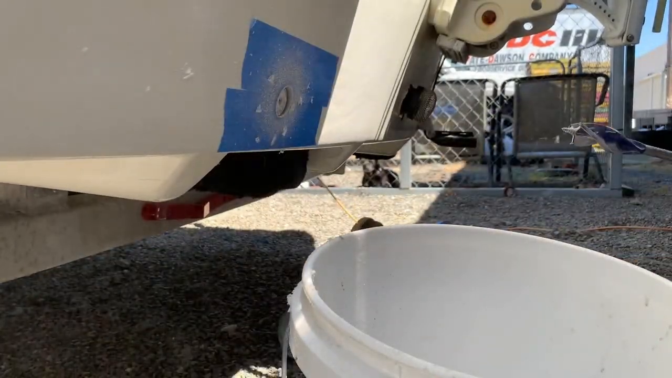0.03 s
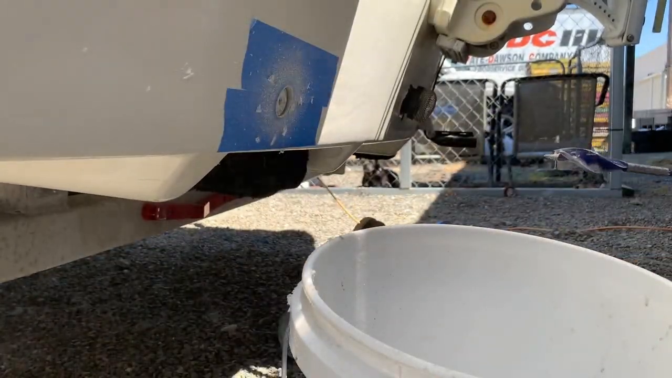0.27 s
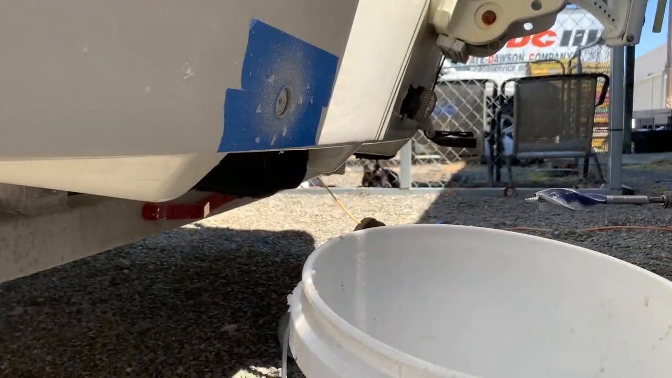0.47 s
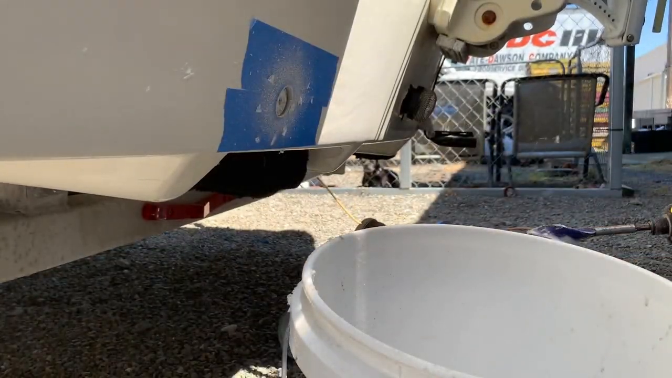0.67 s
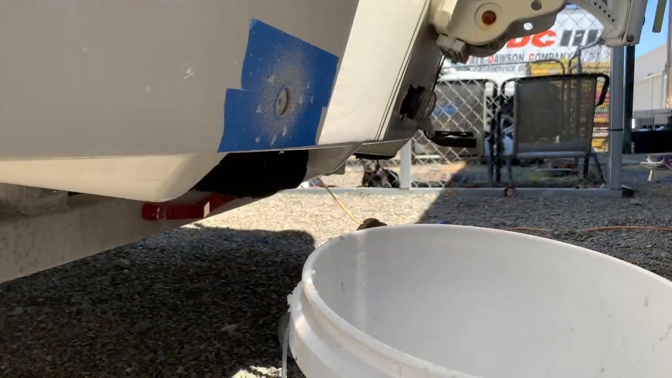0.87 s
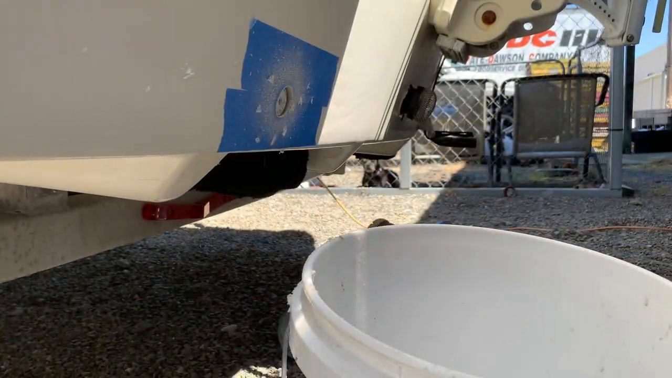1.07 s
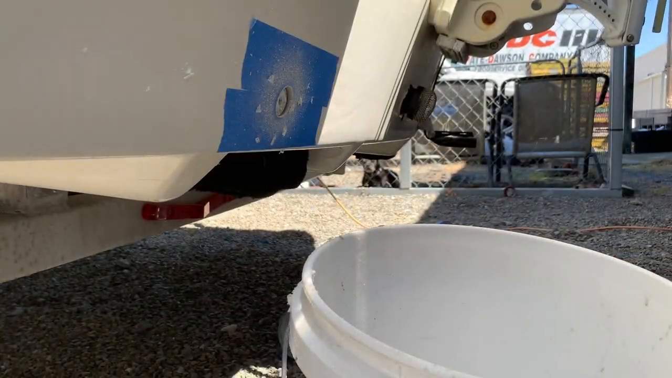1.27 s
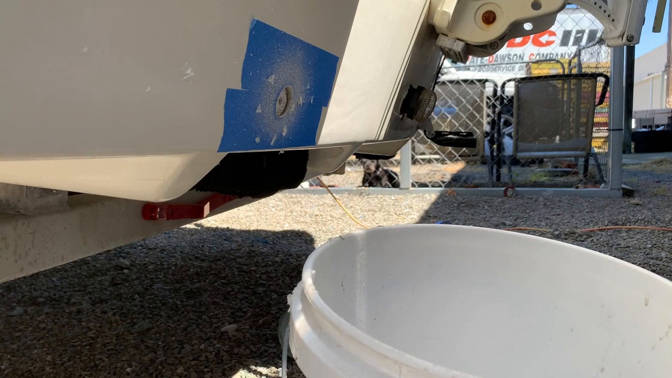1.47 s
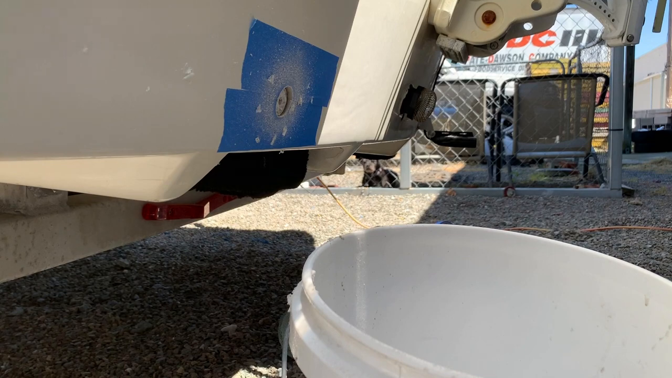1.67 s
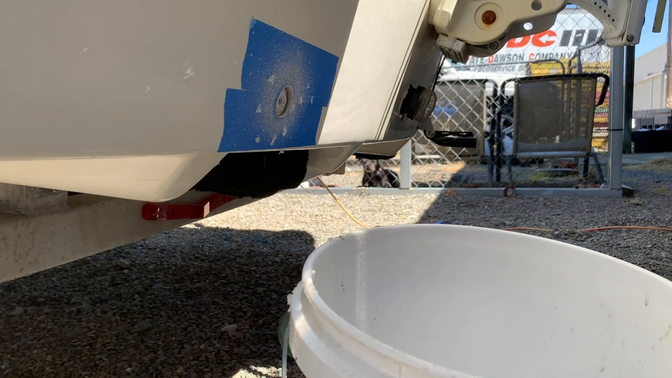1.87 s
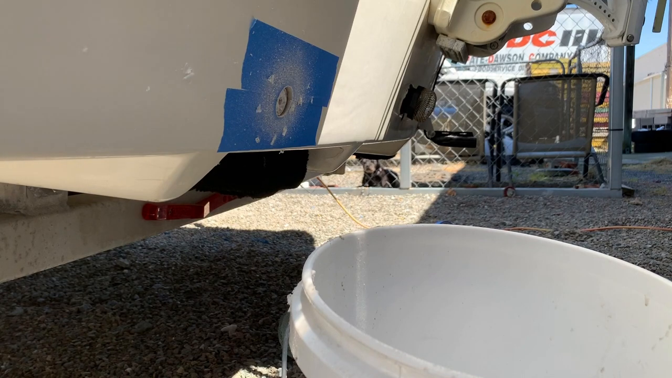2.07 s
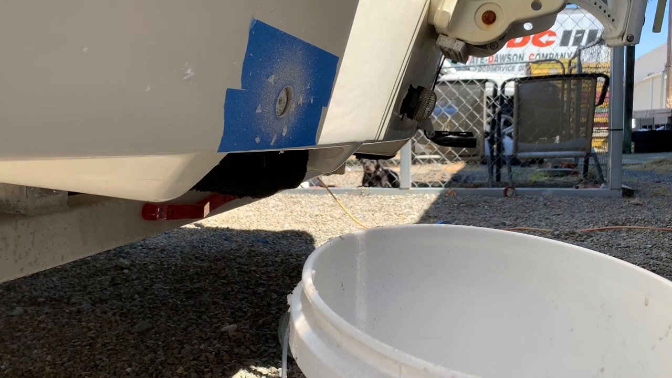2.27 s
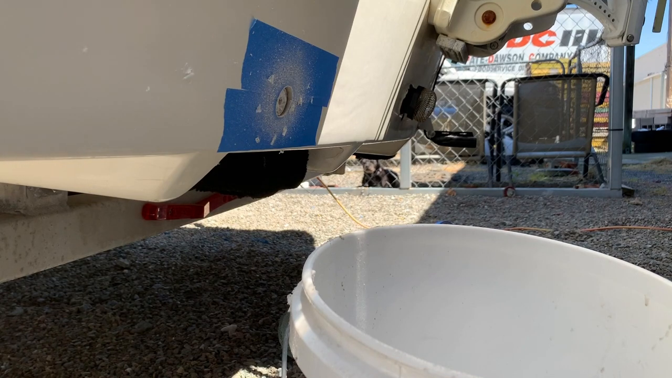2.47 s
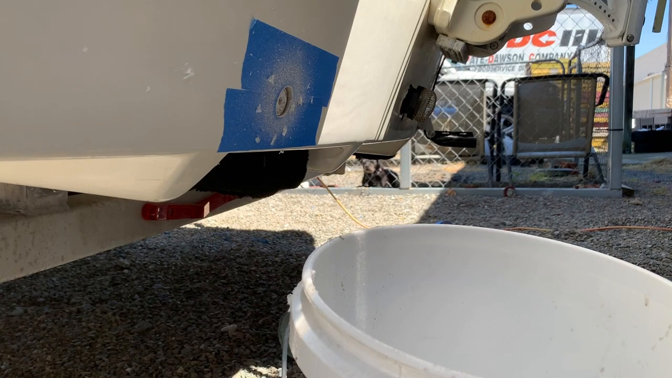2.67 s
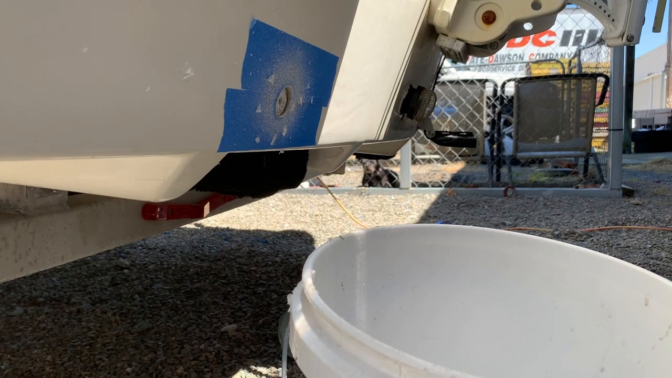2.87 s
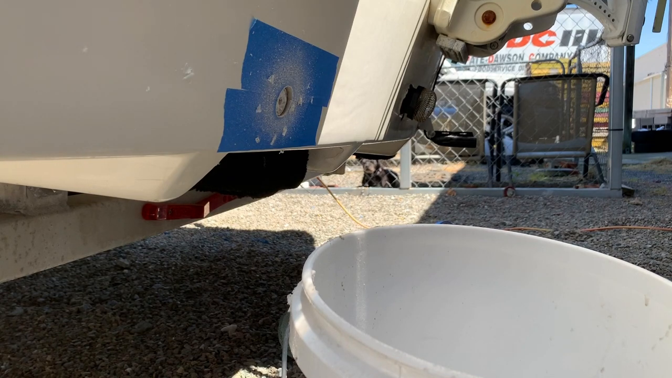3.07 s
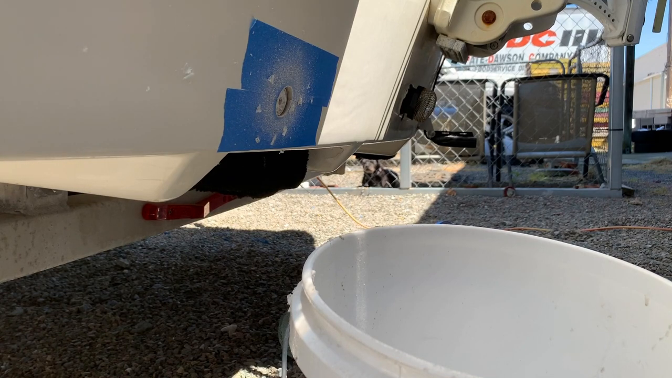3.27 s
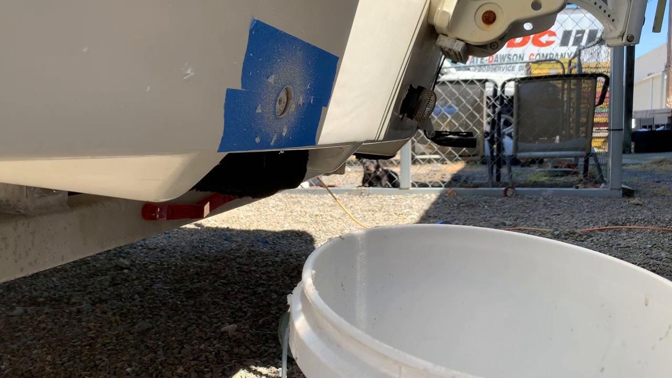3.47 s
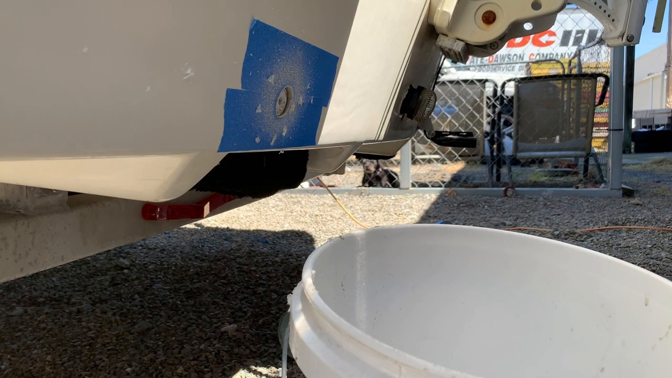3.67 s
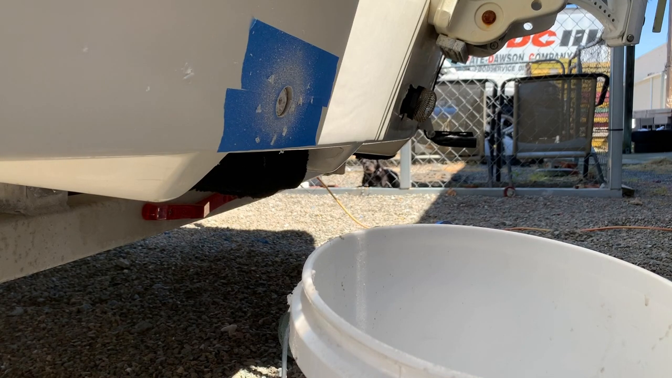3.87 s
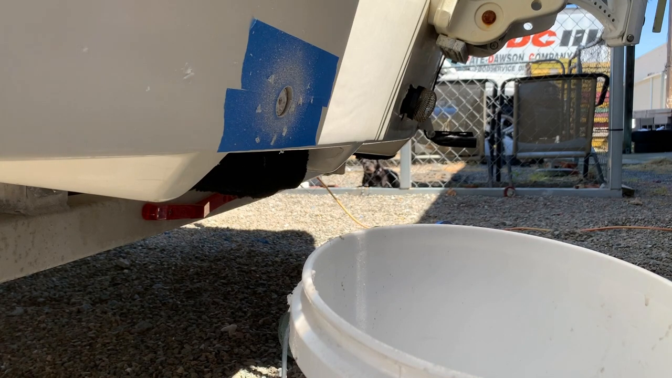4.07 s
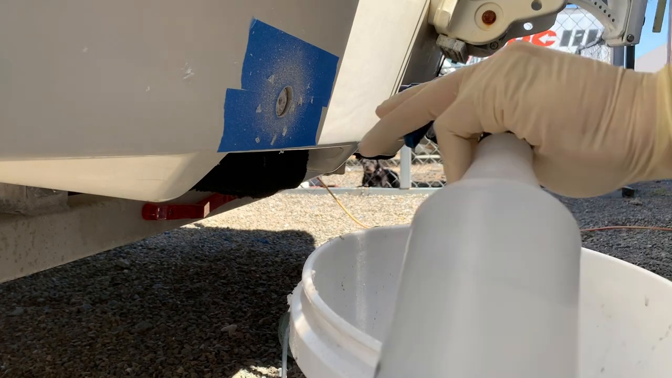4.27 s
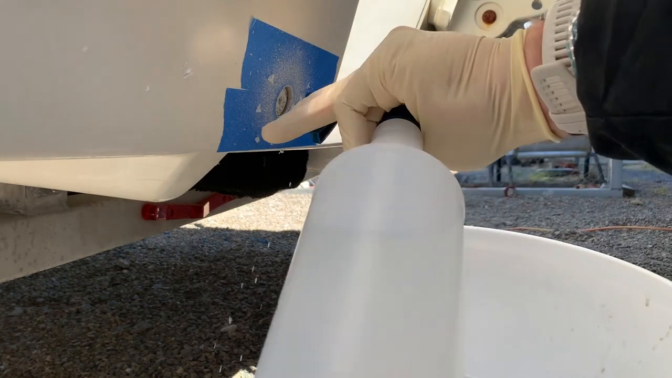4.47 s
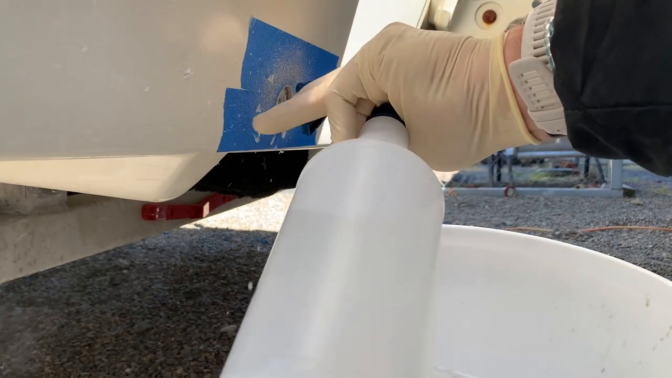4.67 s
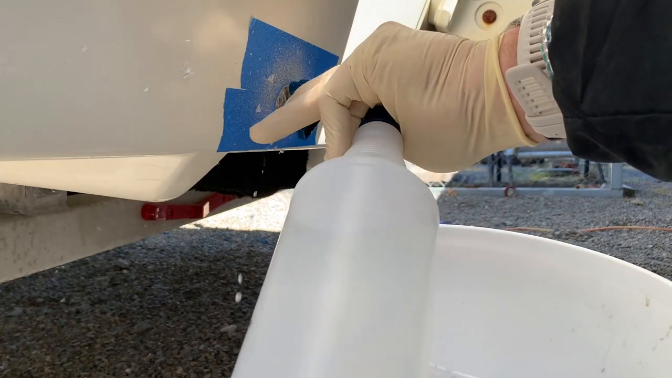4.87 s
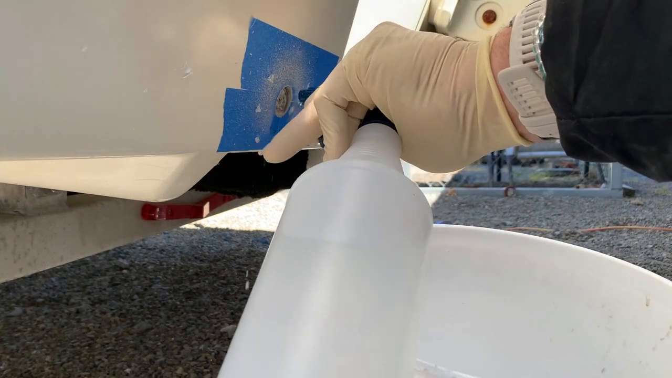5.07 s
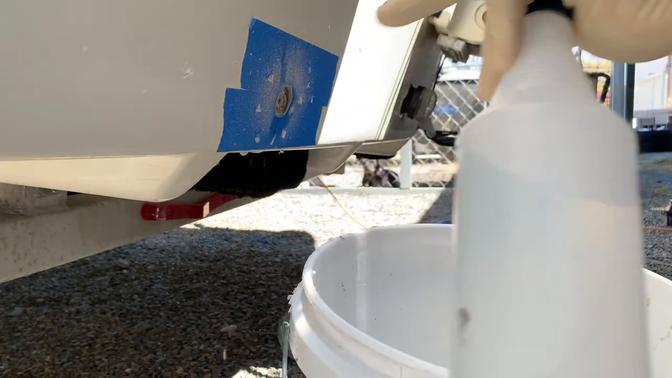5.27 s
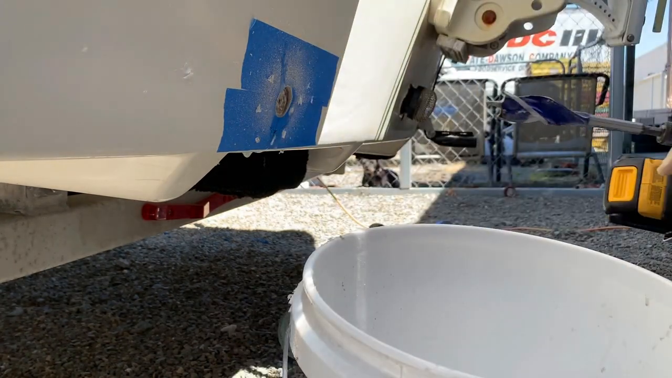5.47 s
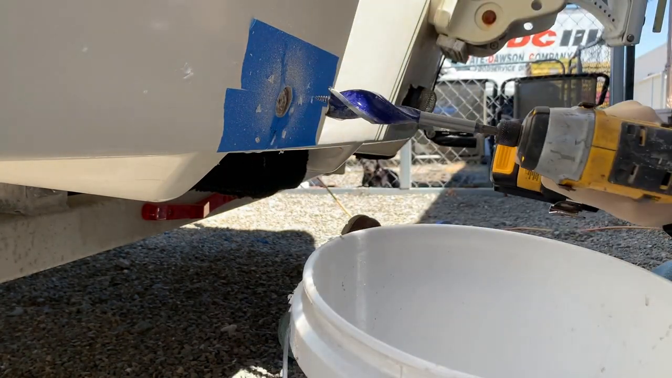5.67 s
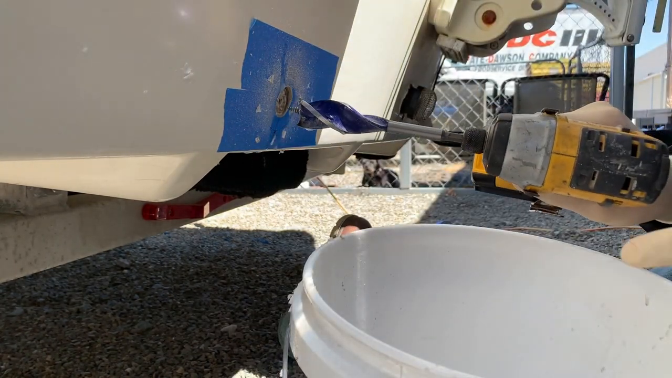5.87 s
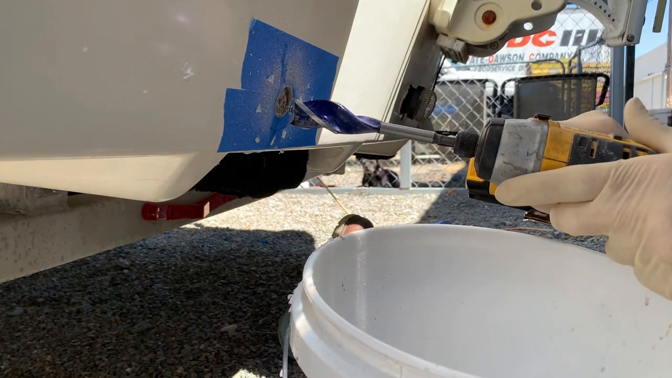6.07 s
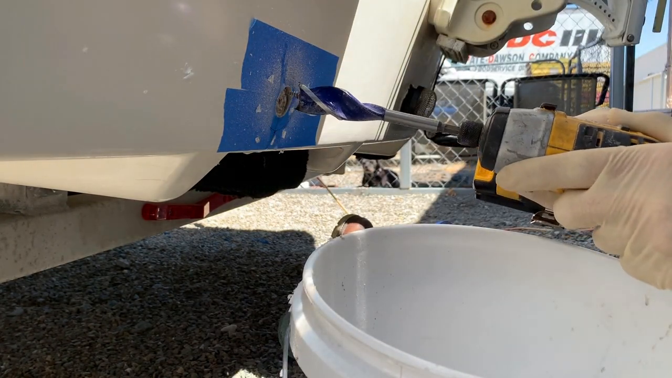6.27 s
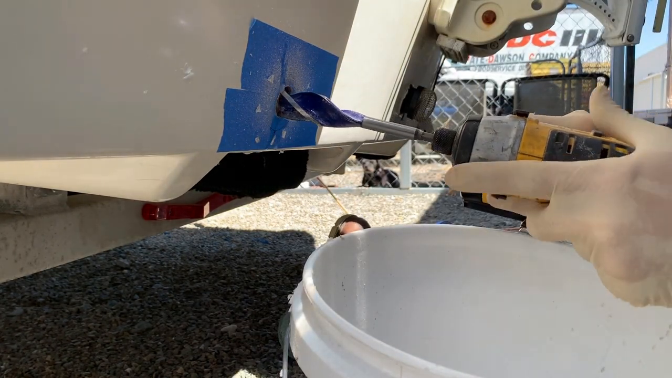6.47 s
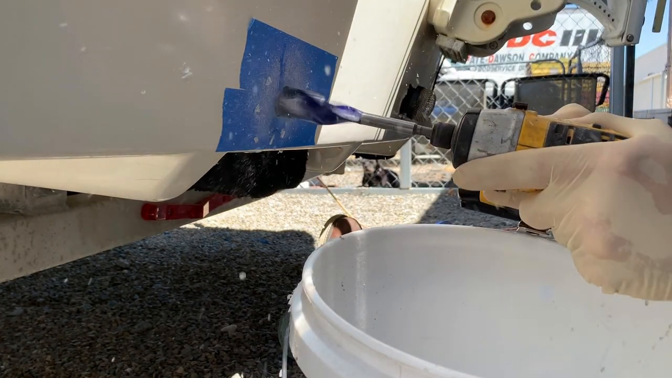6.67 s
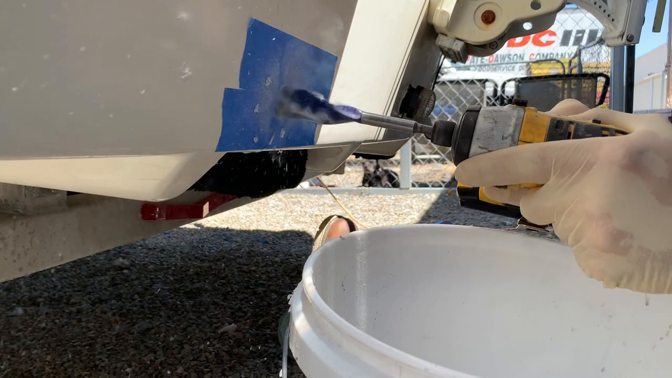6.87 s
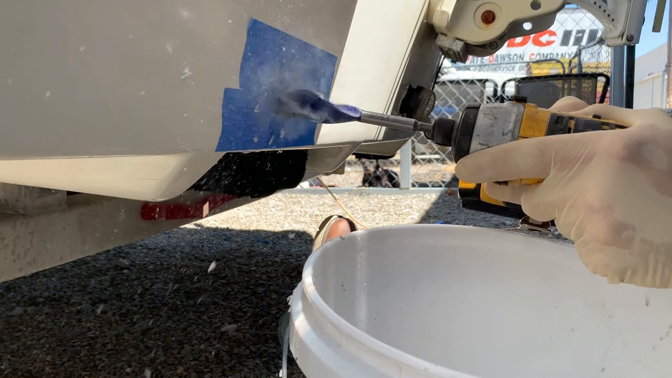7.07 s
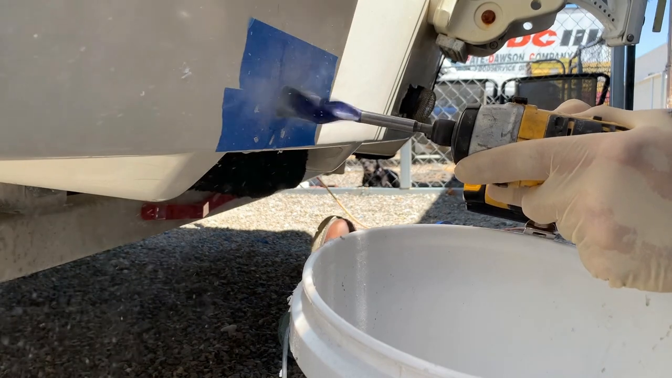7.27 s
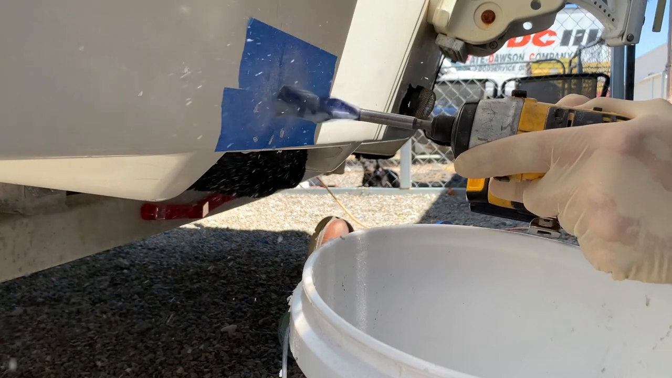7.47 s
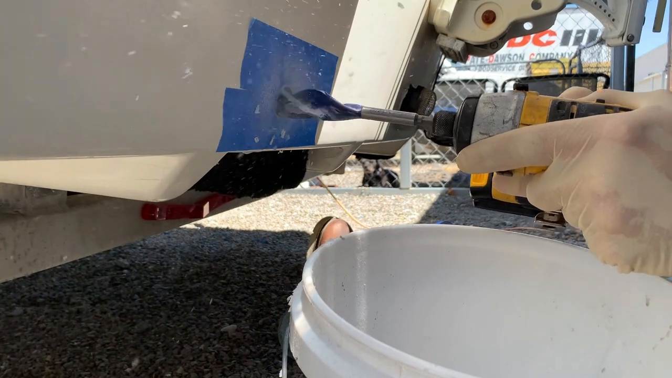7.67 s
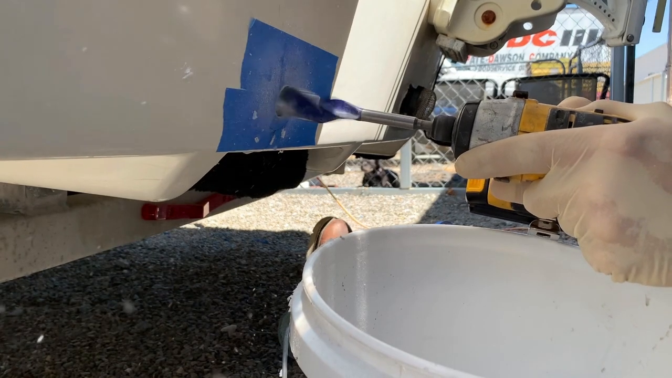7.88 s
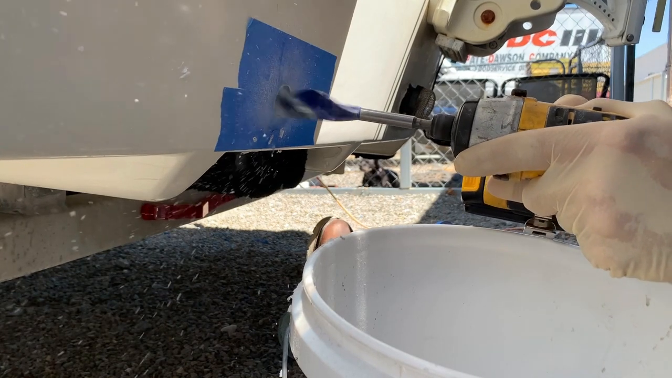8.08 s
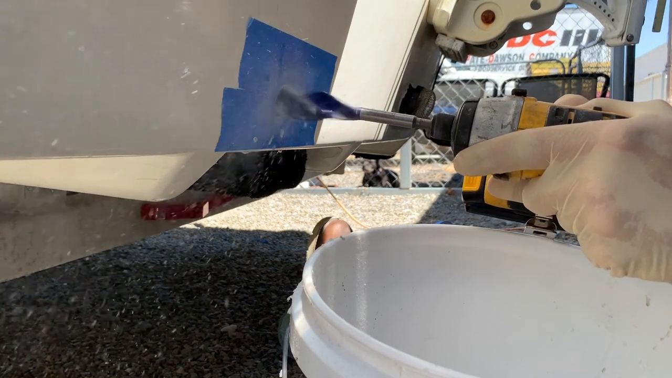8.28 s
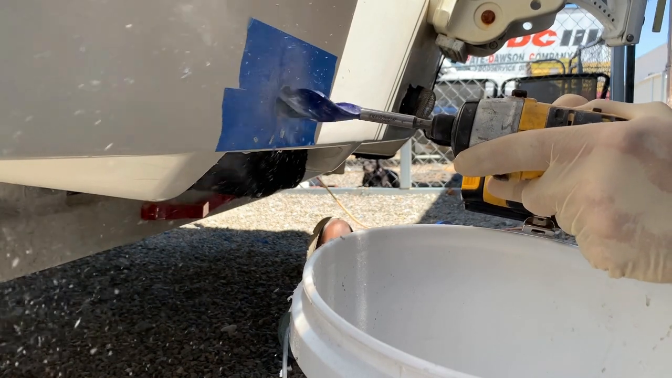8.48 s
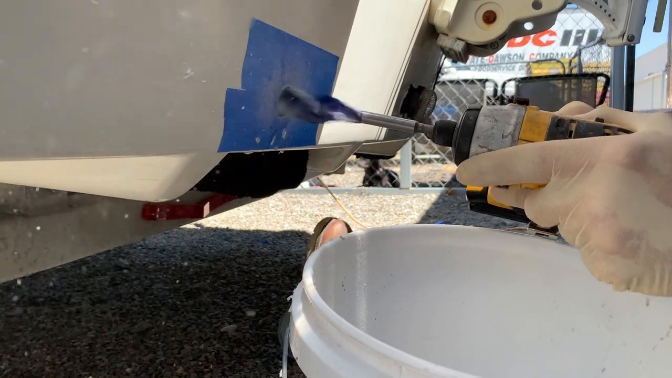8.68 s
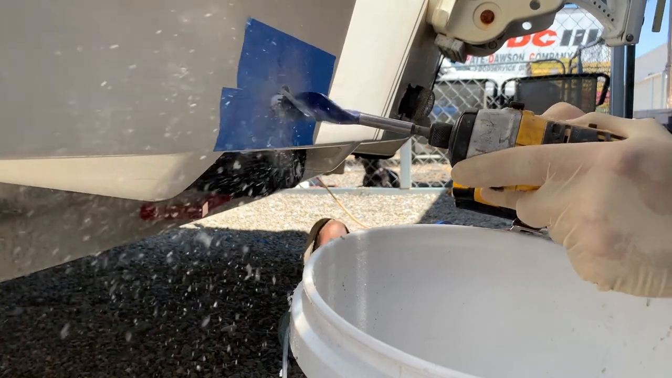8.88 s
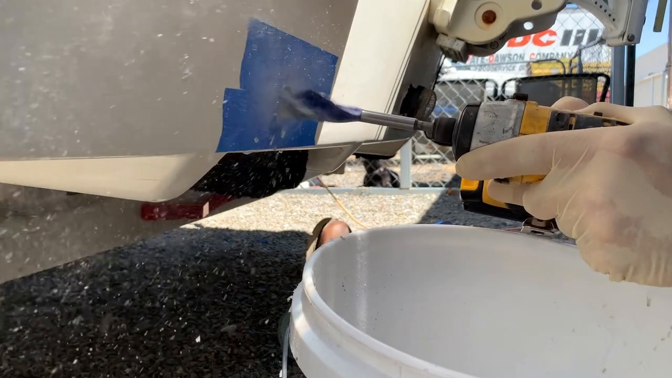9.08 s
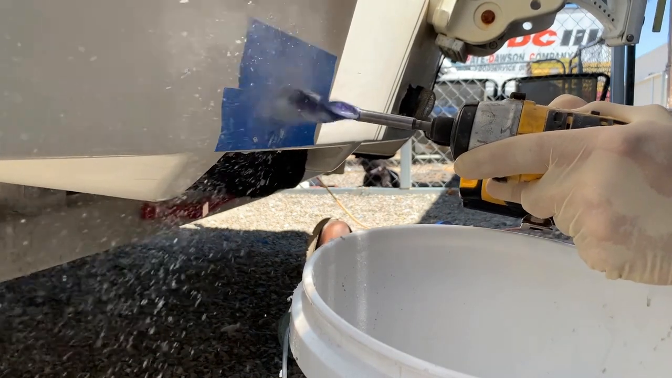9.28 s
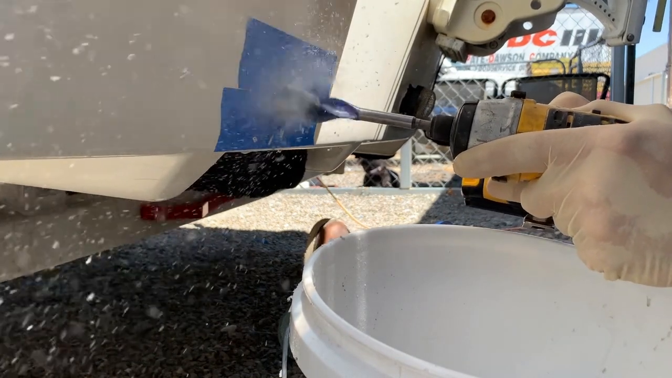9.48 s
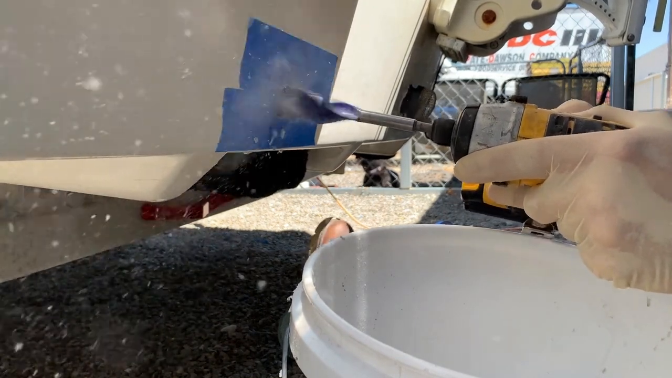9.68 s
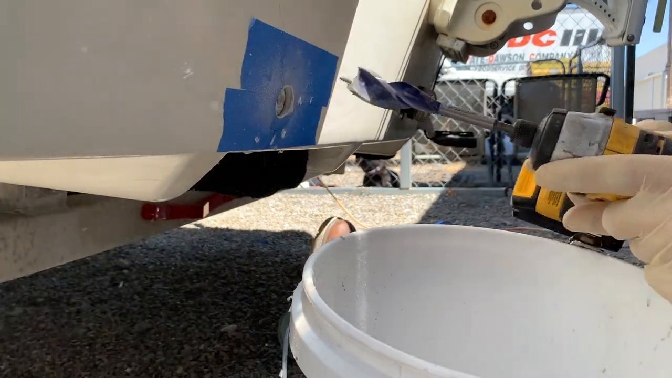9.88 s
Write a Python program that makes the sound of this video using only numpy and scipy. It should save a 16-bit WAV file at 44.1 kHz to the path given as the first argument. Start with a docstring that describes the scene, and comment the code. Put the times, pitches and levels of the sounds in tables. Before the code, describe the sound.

Outdoors beside a fiberglass hull, a trigger bottle squirts faintly in quick spells, growing closer and louder with ticks and creaks. Gloved handling brings clacks, dull bumps and one sharp knock. Then an impact driver starts abruptly, its high gear whine wavering as the bit scrapes, hisses dust and rattles in hammer bursts. Low yard rumble lies beneath, with tiny distant chirps. Close stereo microphones; the driver stops just before the end.

```python
"""Spray bottle and impact driver at a boat hull

Outdoors, close to a fibreglass hull, in stereo: a trigger bottle squirts in spells, mostly six or seven strokes
a second, as noise bursts with mist and creaks; knocks, ringing tones and rustles follow the handling of it.
Then a cordless impact driver bores into the hull: gear and motor partials follow its sagging speed, noise makes
scrape and dust, the hammer rattles and falling chirps thump the panel. Beneath lie a low yard rumble and air
noise, with a small bird far off."""
import sys
import numpy as np
from scipy import signal
from scipy.fft import rfft, irfft, next_fast_len
from scipy.io import wavfile

SR = 44100
rng = np.random.default_rng(int(sys.argv[2]) if len(sys.argv) > 2 else 0)


def dump_mix(stems):
    """Bounce the given channels to the path in sys.argv[1] as a 16-bit WAV at rate SR."""
    frames = np.atleast_2d(stems).T  # one column per channel
    limited = np.clip(frames, -1, 1)  # hard clip at full scale
    pcm = np.round(limited * 32767).astype(np.int16)
    wavfile.write(sys.argv[1], SR, pcm)


N = 438354
TIME = np.arange(N) / SR

# Levels in the tables are starting points: the functions add trims and random flutter.
# COLOUR tables are spectra: [f/Hz, relative level/dB]; resonances are [f/Hz, width/Hz, lift/dB].

# Yard background: [t/s, rumble level/dB, air level/dB]
YARD_LEVELS = [(0, -63, -76), (1.8, -62, -75.5), (3.2, -52.5, -68), (4.3, -49.5, -66), (5.7, -39.5, -56),
               (6.05, -44.5, -60), (6.55, -43.5, -52.5), (6.8, -68, -80), (9.93, -63.5, -71)]
# Spectra of the yard rumble and of the air noise: [f/Hz, relative level/dB]
RUMBLE_COLOUR = [(25, -35), (45, -35), (80, -7), (150, 1.5), (220, 0), (330, -8), (450, -13), (800, -23),
                 (2000, -56.5)]
AIR_COLOUR = [(40, -24.5), (200, 1.5), (600, 7), (1300, 6), (2500, -0.5), (5000, -9.5), (9000, -12.5),
              (14000, -14), (16000, -30)]
RUMBLE_RESONANCE = [(143, 11.0, 6.4)]

# Brushes of glove and sleeve: [t/s, level/dB]
RUSTLES = [(.06, -69), (.22, -64), (.5, -85), (1.09, -67.5), (4.24, -56), (4.38, -57.5), (5.38, -60),
           (5.54, -57), (5.74, -46.5), (6.1, -51.5), (6.22, -55)]
RUSTLE_COLOUR = [(600, 11.5), (1500, 4.5), (3000, 4.5), (6000, -6.5), (9000, -5), (13500, -12.0), (16000, -28.0)]

# Spells of pumping the bottle: [start t/s, number of strokes, rate/(strokes per s), spurt level/dB,
# mist level/dB, pump thunk level/dB, swell of all three from first to last stroke/dB]
PUMPING_SPELLS = [(0.212, 2, 3.25, -70, -84, -72, 9.5), (1.125, 3, 7.6, -73.5, -89, -64.5, 13.5),
                  (1.55, 4, 7.4, -66, -69, -63.5, 2.5), (2.096, 2, 6.6, -71, -68, -57, -4),
                  (2.489, 4, 6.3, -60, -68.5, -65, 9.5), (3.131, 6, 6.2, -55, -59.5, -56.5, 0.5),
                  (4.643, 1, 6, -50.5, -68, -70, 0), (4.776, 2, 5.7, -41.5, -66.5, -52.5, -0.5),
                  (5.107, 1, 6, -41, -58, -50.5, 0)]
STROKE_SCATTER_DB = 1.7
# Spectra of the spurt and of the trailing mist: [f/Hz, relative level/dB]
SPURT_COLOUR = [(300, -12.5), (650, 13.5), (1000, -13), (1400, 2), (2000, -4.5), (4000, -5.5), (6500, -6),
                (9000, 1.5), (11500, 0.5), (13500, 4.5), (16000, -1.5)]
MIST_COLOUR = [(500, -11), (1400, 9.5), (2100, 3.5), (3300, -1), (6000, -3), (9000, 0), (11500, -6),
               (14000, 15), (16000, -4)]
MIST_BANDS = [(3800, -4), (9000, -6), (14000, -3)]  # drifting parts of the mist: [f/Hz, relative level/dB]
THUNK_COLOUR = [(200, -39.0), (450, -6.0), (560, 4), (680, -14), (950, -53), (4000, -66)]
TICK_COLOUR = [(300, -20), (2500, -5.5), (6000, -1.5), (10000, 5.0), (16000, 5.5)]
# Stray ticks of drops and of the grip: [t/s, level/dB]
STRAY_TICKS = [(2.306, -51), (4.3012, -38), (4.365, -35.5), (4.699, -38), (4.731, -35), (4.872, -41.5),
               (4.904, -33.5), (4.93, -29), (5.051, -43), (5.2, -36.5), (5.238, -29.5), (5.255, -32),
               (5.367, -38), (5.3977, -36), (6.447, -27.5)]
# Creak of the trigger ahead of a spurt: ticks per creak, spacing, lead of the last tick, timing scatter
CREAK_TICKS, CREAK_GAP_S, CREAK_LEAD_S, CREAK_JITTER_S = 4, 0.01093, 0.00944, 0.0026
# Last tick against the spurt, drop for each tick before it, and random spread
CREAK_OVER_SPURT_DB, CREAK_STEP_DB, CREAK_SCATTER_DB = 11.5, 2.5, 2

# Chirps of a small bird far off: [t/s, level/dB]
CHIRPS = [(.63, -69), (1.66, -67), (2.52, -64), (5.19, -56), (6.22, -56.5)]

# Knocks of handled bottle and driver: [onset t/s, hollow body level/dB, clack level/dB, click level/dB,
# decay/s (the click takes a share of it)]
KNOCKS = [(1.109, -50.5, -56, -53.5, 0.022), (1.148, -58.5, -60, -74, 0.057),
          (1.266, -59.5, -62.5, -68.5, 0.12), (1.486, -54, -60.5, -68, 0.013),
          (2.089, -60, -60.5, -61, 0.012), (4.104, -73, -52.5, -53, 0.019), (5.275, -44, -37, -50, 0.017),
          (5.313, -38.5, -37.5, -48, 0.013), (5.366, -50, -43.5, -57, .006), (5.53, -45, -48.5, -62, 0.021),
          (5.572, -26, -31.5, -22.5, 0.012), (5.618, -55, -48, -42, 0.0082),
          (5.714, -39, -39.5, -55, 0.0085), (5.741, -39, -49, -62, .012), (5.782, -37.5, -50, -62, 0.0046),
          (5.82, -46, -38, -40, 0.0056), (5.858, -31, -35, -55, 0.0068), (5.878, -41, -38.5, -58, .006),
          (6.19, -43.5, -45, -58, 0.014), (6.447, -48, -43.5, -49, 0.029), (6.495, -36, -42.5, -47, 0.02),
          (6.509, -45, -39.5, -43, 0.026), (6.559, -40, -33.5, -41.5, 0.1)]
BODY_COLOUR = [(35, -30.5), (120, -15.5), (380, -1.5), (560, -2.0), (680, -4.0), (950, -25.0), (4000, -44.0)]
CLACK_COLOUR = [(50, -46.5), (300, -7.5), (800, 6.5), (1500, -4.5), (3600, 0.5), (6000, -14.5), (14000, -42.0)]
CLICK_COLOUR = [(1500, -31.0), (4500, -5.0), (7700, -0.5), (11000, -4.5), (16000, -8.5)]
# Resonances of the clack, then of the click: [f/Hz, width/Hz, lift/dB]
PLASTIC = [(1020, 120, 1), (1510, 240, 9), (2270, 560, 3), (2900, 370, 2.5), (3520, 420, -2)]
METAL = [(6600, 300, 0.5), (7670, 380, 2.5), (9620, 350, 3)]
# Two ringing modes of a part struck hard: [t/s, level/dB, lower f/Hz, upper f/Hz, decay/s]
RINGS = [(1.11, -55, 523, 735, 0.016), (1.488, -51.5, 520, 646, .014), (5.276, -36, 2214, 3070, .009),
         (5.314, -37, 1020, 1600, .01), (5.576, -20, 559, 1870, 0.006), (5.82, -32, 1186, 1506, 0.0068),
         (5.861, -31, 1020, 1490, 0.0094), (5.863, -32.5, 384, 634, 0.017),
         (6.192, -36.5, 1200, 1520, 0.0092)]

# Dull bumps of handling: [onset t/s, level/dB, f/Hz]
BUMPS = [(4.925, -28, 138), (4.99, -39, 146), (5.211, -37, 153), (5.315, -24, 172), (5.378, -25.5, 130),
         (5.447, -27, 112), (5.585, -38, 141), (5.648, -31, 150)]
BUMP_COLOUR = [(30, -45), (80, 10.0), (300, 0.5), (450, -7.5), (1200, -51)]

# Driver: start and end of the trigger pull, with the fades in and out
TRIGGER_ON_S, SPIN_UP_S, TRIGGER_OFF_S, BRAKE_S = 6.57, .05, 9.755, 0.031
# Nominal gear whine, following the motor speed: [t/s, f/Hz]
WHINE_PITCH = [(6.66, 7800), (6.74, 8414), (6.83, 7656), (6.88, 8150), (6.95, 7330), (7.03, 7876),
               (7.1, 6875), (7.16, 7802), (7.25, 7385), (7.37, 9380), (7.44, 7490), (7.47, 7460),
               (7.51, 8330), (7.55, 7620), (7.73, 7570), (7.8, 8085), (7.85, 8050), (7.92, 8646),
               (8.01, 8636), (8.11, 7176), (8.18, 7350), (8.26, 6970), (8.42, 6873), (8.49, 7780),
               (8.58, 7090), (8.68, 8570), (8.77, 9420), (8.86, 7202), (8.95, 7130), (9.0, 7670),
               (9.13, 7260), (9.19, 7414), (9.28, 6800), (9.35, 6850), (9.4, 6586), (9.45, 6880),
               (9.52, 6796), (9.62, 7160), (9.77, 8880)]
WOBBLE, WOBBLE_PER_S = .005, 22  # uneven laminate wavers the speed: share of speed, changes per second
TEETH, TOOTH_ROUGHNESS = 36, .55
# Strength of the cut: [t/s, scrape level/dB, dust hiss level/dB, motor hum level/dB]
BORING = [(6.72, -43, -45.5, -42), (6.88, -38.5, -42.5, -42), (7.07, -43.5, -49.5, -68),
          (7.19, -41, -49, -47.5), (7.33, -45, -50, -55.5), (7.41, -42, -40.5, -44), (7.55, -43, -49, -64),
          (7.81, -44, -50, -49.5), (8.0, -49, -52.5, -48.5), (8.1, -44.5, -42.5, -46.5),
          (8.38, -45, -44, -47), (8.76, -44, -41.5, -48), (9.04, -42, -48, -51.5), (9.18, -46, -50, -48),
          (9.26, -43.5, -44, -53.5), (9.45, -43, -43.5, -48), (9.6, -45.5, -46, -45.5),
          (9.74, -47, -47.5, -51.5)]
WHINE_OVER_SCRAPE_DB = 2.5  # the gears grow louder with the cut
# Motor hum partials: [multiple of shaft rate], then [relative level/dB]
HUM_ORDERS = (1, 2, 3, 4, 5, 6, 7, 8, 9, 10, 11, 12, 17.3, 18, 20)
HUM_DB = (-4.5, -6.5, -0.5, -6, -7.5, -5, -3.5, -5.5, -5, -6, -8.5, -6, -1, 4.5, 4)
# Gear partials around the tooth rate: [multiple of shaft rate], then [relative level/dB]
GEAR_ORDERS = (34.7, 36, 37.3)
GEAR_DB = (-4, 6, -16)
# Thin whines of loaded gears: [multiple of shaft rate], then [level relative to squeal/dB]
LOAD_ORDERS = (44.8, 46, 53.4)
LOAD_DB = (-11, -13, -10.5)
# Above this whine pitch the squeal and the thin whines fade
SQUEAL_BELOW_HZ, SQUEAL_FADE_DB_PER_HZ, LOAD_FADE_DB_PER_HZ = 7250, 0.1, 0.1
SQUEAL_OVER_DUST_DB = 5.5
# Resonances of the hull panel, then of the driver casing: [f/Hz, width/Hz, lift/dB]
HULL = [(210, 220, 0.5), (427, 64, 5), (642, 147, 8.5), (878, 24, 8.5), (1039, 62, 9), (1162, 115, 7),
        (1453, 133, 13), (1610, 50, 4), (1848, 93, 9.5), (2260, 96, 8.5), (2470, 205, 10), (2750, 70, 5.5),
        (2957, 85, 8), (3185, 110, 6.5), (4000, 640, 3)]
CASING = [(611, 37, 5.5), (730, 170, -0.5)]
# Spectra of the scrape and of the dust hiss: [f/Hz, relative level/dB]
SCRAPE_COLOUR = [(50, -34.5), (180, -8), (500, -3.5), (1000, -0.5), (2050, 0), (2700, 0), (4000, 2.5),
                 (5400, -1.5), (8000, -9.5)]
DUST_COLOUR = [(3000, -28), (5900, -4.5), (7000, 3.5), (9000, 7), (10300, 2.5), (13000, 2), (14200, 1),
               (16000, -3)]

# Bit catching and flexing the panel: [t/s, level/dB]
THUMPS = [(6.59, -31), (6.65, -32), (6.691, -33), (7.467, -33.5), (7.496, -29.5), (7.507, -33.5),
          (8.43, -42), (8.548, -31.5), (8.81, -41.5), (8.863, -35), (8.902, -37), (8.913, -37),
          (9.414, -44), (9.501, -31)]

# Bit binding while the hammer rattles: [start t/s, number of blows, rate/(blows per s), body level/dB,
# crack level/dB, change of crack from first to last/dB]
BINDS = [(6.604, 1, 75, -18, -19, 0), (6.628, 6, 78.6, -31, -31.5, 1.5), (6.93, 1, 75, -28.5, -38, 0),
         (6.951, 8, 79, -30.5, -38, -2), (7.111, 3, 49, -31, -37.5, -1), (7.459, 5, 79.5, -29.5, -31.5, 1),
         (7.522, 1, 75, -33, -40, 0), (7.572, 17, 81.4, -33, -39, 2), (7.862, 1, 75, -40, -50, 0),
         (8.304, 1, 75, -32.5, -31, -1), (8.431, 9, 68, -31, -31.5, 2), (8.812, 2, 78, -30, -31.5, -4),
         (8.865, 12, 80.6, -31, -36, -10.5), (9.415, 1, 74, -33, -36, 0), (9.483, 2, 53.6, -32, -35, 0.5)]
BLOW_JITTER_S, BLOW_BODY_SCATTER_DB, BLOW_CRACK_SCATTER_DB = 0.00021, 0.7, 1.3
# Spectra of the body and of the crack of a blow: [f/Hz, relative level/dB]
BLOW_COLOUR = [(50, -24.5), (130, -16.5), (400, -4.5), (800, -1.5), (1400, 1.5), (2100, 1), (2700, -0.5),
               (3500, -1), (4500, 0), (6000, 0.5), (9000, -9)]
CRACK_COLOUR = [(2500, -32.5), (5500, -10), (7500, 2), (9200, 7), (11000, -3), (13000, 7.5), (14500, 6),
                (16000, -3)]
# Parts of the panel's range rung unevenly by each blow: [f/Hz, level relative to blow/dB]
RAPS = [(1100, -11.5), (1750, -10), (2800, -6.5)]
RAP_SCATTER_DB = 3

# Stereo at the two microphones. BALANCE: [f/Hz, left over right/dB]; DIFFUSE: [f/Hz, side level/dB]
SMALL_BALANCE = [(500, 1.0), (1300, 1.0), (4400, 0.0), (8100, -6.0), (15000, -4.0)]
SMALL_DIFFUSE = [(640, -10.5), (1400, -1.5), (15000, 0.5)]
TOOL_BALANCE = [(700, -1.0), (1300, 2.5), (2400, 4.5), (4400, -1.0), (8100, -4.5), (15000, -3.0)]
TOOL_DIFFUSE = [(640, -15.5), (1400, -6.0), (7000, -4.5), (15000, -2.5)]
# Hull resonances reach the microphones out of step: [f/Hz, phase lead of the left/rad]
HULL_LEAD = [(900, 0), (1210, 1.1), (1460, -.8), (1890, .6), (2240, -.7), (2930, .3), (3880, 0)]
TOP_HZ = 15900


def undb(db):
    """Decibels to gain."""
    return 10 ** (np.asarray(db) / 20)


def unit(x):
    """Scale to rms 1."""
    return x / np.sqrt(np.mean(x ** 2))


def curves(rows):
    """Each column of a table as a control at every sample."""
    s, *columns = np.transpose(rows)
    return [np.interp(TIME, s, c) for c in columns]


def across(points, f):
    """Read (Hz, value) points on a log-frequency axis."""
    hz, value = np.transpose(points)
    return np.interp(np.log(f + 1), np.log(hz + 1), value)


def colour(x, points, peaks=(), size=4096):
    """Minimum-phase filter from a smooth spectrum plus resonances; white noise keeps its power."""
    f = np.fft.rfftfreq(size, 1 / SR)
    db = across(points, f)
    for hz, width, lift in peaks:
        db = db + lift * np.exp(-2 * ((f - hz) / width) ** 2)
    # folding the cepstrum forward in time makes the filter causal
    cepstrum = irfft(np.log(undb(db)))
    cepstrum[1:size // 2] *= 2
    cepstrum[size // 2 + 1:] = 0
    response = irfft(np.exp(rfft(cepstrum)))[:size // 2]
    return signal.oaconvolve(x, response / np.linalg.norm(response))[:N]


def walk(rate):
    """Random levels, `rate` a second, joined by straight lines and scaled to rms 1."""
    count = int(rate * N / SR) + 2
    return unit(np.interp(TIME * rate, np.arange(count), rng.standard_normal(count)))


def grit(spread_db):
    """Noise made of sub-millisecond fractures of uneven size."""
    return unit(rng.standard_normal(N) * undb(spread_db * walk(2500)))


def bursts(times, dbs, rise_s, fall_s, roundness=1):
    """Envelope of events that swell to a peak and die away; roundness 1 is pointed, 2 a bell."""
    power = np.zeros(N)
    for s, db, rise, fall in np.broadcast(times, dbs, rise_s, fall_s):
        span = slice(max(int((s - 8 * rise) * SR), 0), int((s + 8 * fall) * SR))
        t = TIME[span] - s
        shape = np.exp(-np.maximum(-t / rise, t / fall) ** roundness)
        power[span] += (undb(db) * shape) ** 2
    return np.sqrt(power)


def train(start_s, count, per_s):
    """Evenly spaced times, each with its place in the series from -1/2 to 1/2."""
    k = np.arange(round(count))
    return zip(start_s + k / per_s, (k - k.mean()) / max(k[-1], 1))


def place(direct, scattered, balance, diffuse, lead=((1, 0), (2, 0))):
    """Stereo image: direct sound tilts and leads by frequency; scatter with other fine grain widens it."""
    n = next_fast_len(N, True)
    f = np.fft.rfftfreq(n, 1 / SR)
    ratio = undb(across(balance, f)) * np.exp(1j * across(lead, f))  # left over right
    tilt = rfft(direct, n) * (ratio - 1) / (ratio + 1)
    width = rfft(scattered, n) * undb(across(diffuse, f))
    side = irfft(tilt + width, n)[:N]
    return direct + np.array([side, -side])


def yard():
    """Low rumble and faint air noise: their level swells slowly, then drops low while the driver runs."""
    rumble_db, air_db = curves(YARD_LEVELS)
    rumble, air = [], []
    for _ in range(2):  # middle, then side
        rumble_noise = rng.standard_normal(N) * undb(rumble_db - 1.5 + 0.94 * walk(12))
        rumble.append(colour(rumble_noise, RUMBLE_COLOUR, RUMBLE_RESONANCE))
        air.append(colour(grit(3.4) * undb(air_db + 3.26 * walk(10)), AIR_COLOUR))
    side = undb(-13.5) * rumble[1] + undb(-0.5) * air[1]
    return rumble[0] + air[0] + np.array([side, -side])


def rustle():
    """Glove and sleeve brush over bottle and driver in soft swells of gritty noise."""
    s, db = np.transpose(RUSTLES)
    return colour(grit(4.4) * bursts(s, db, 0.064, 0.039), RUSTLE_COLOUR)


def strokes():
    """The finger pumps at an even pace but with uneven force: rows of t/s, spurt, mist and thunk/dB."""
    rows = []
    for start_s, count, per_s, *dbs, swell_db in PUMPING_SPELLS:
        for s, part in train(start_s, count, per_s):
            force_db = STROKE_SCATTER_DB * rng.standard_normal(len(dbs))
            rows.append((s, *(np.add(dbs, swell_db * part) + force_db)))
    return rows


def creaks(s, spurt_db):
    """The trigger sticks and slips in ticks that grow towards each spurt: rows of t/s, level/dB."""
    ticks = []
    for k in range(CREAK_TICKS):  # counted back from the spurt
        early, uneven = rng.standard_normal((len(s), 2)).T
        tick_s = s - CREAK_LEAD_S - k * CREAK_GAP_S - CREAK_JITTER_S * early
        tick_db = spurt_db + CREAK_OVER_SPURT_DB - k * CREAK_STEP_DB + CREAK_SCATTER_DB * uneven
        ticks.extend(zip(tick_s, tick_db))
    return ticks


def sputter(rate_hz=105, decay=0.32, steady=0.28):
    """Air in the nozzle chops the jet into an uneven train of spits."""
    phase = np.cumsum(rate_hz * undb(4.5 * walk(60))) / SR
    spits = undb(2.9 * walk(100)) * np.exp(-(phase % 1) / decay)
    return unit(steady + spits)


def mist(s, db, drift_db=3):
    """A soft swell of mist follows each spurt; its colour drifts as the jet wanders."""
    swell = bursts(s + 0.053, db, 0.033, 0.045, roundness=1.46)
    out = colour(grit(4.5) * swell * undb(-5.5), MIST_COLOUR)
    for hz, band_db in MIST_BANDS:
        band = [(hz / 4, -24), (hz / 2, -8), (hz, 0), (hz * 2, -12), (hz * 4, -30)]
        out += colour(grit(4.9) * swell * undb(band_db + drift_db * walk(14)), band)
    return out


def sprayer(pumping, ticking):
    """Each stroke creaks the trigger, thunks the pump and spits a spurt, then a softer mist trails off."""
    s, spurt_db, mist_db, thunk_db = pumping
    jet = grit(2.6) * sputter(steady=0.76)
    spurt = colour(jet * bursts(s, spurt_db + 5, 0.01, 0.016), SPURT_COLOUR)
    thunk = colour(grit(0.91) * bursts(s, thunk_db - 0.5, 0.017, 0.022), THUNK_COLOUR)
    tick_s, tick_db = np.transpose(ticking)
    ticks = colour(grit(1) * bursts(tick_s + 0.0015, tick_db - 3.5, 0.00039, 0.0019), TICK_COLOUR)
    return spurt + mist(s, mist_db) + thunk + ticks


def bird(pitch_hz=7350):
    """Thin chirps, buzzy because their pitch jitters fast."""
    s, db = np.transpose(CHIRPS)
    phase = 2 * np.pi * np.cumsum(pitch_hz * (1 + 0.044 * walk(900))) / SR
    return bursts(s, db, 0.026, 0.033) * np.sin(phase)


def handling():
    """Plastic knocks: a hollow body, a ringing clack and a bright click."""
    s, body_db, clack_db, click_db, fall_s = np.transpose(KNOCKS)
    body = colour(grit(0.41) * bursts(s + 0.004, body_db, 0.0023, fall_s), BODY_COLOUR)
    clack = colour(grit(3.8) * bursts(s + 0.0022, clack_db, 0.0011, fall_s), CLACK_COLOUR, PLASTIC)
    click_envelope = bursts(s + 0.0021, click_db + 0.5, 0.0025, 0.75 * fall_s)
    click = colour(grit(2.3) * click_envelope, CLICK_COLOUR, METAL)
    return body + clack + click


def nearby(pumping, ticking):
    """The bottle, knocks, rustles and bird, which share one stereo image."""
    return sprayer(pumping, ticking) + handling() + rustle() + bird()


def rings(upper_db=-6, rise_s=0.00073):
    """Struck plastic rings in short, hollow tones, two decaying modes to a knock."""
    out = np.zeros(N)
    t = TIME[:SR // 8]
    for s, db, lower_hz, upper_hz, fall_s in RINGS:
        modes = np.sin(2 * np.pi * lower_hz * t) + undb(upper_db) * np.sin(2 * np.pi * upper_hz * t)
        envelope = (1 - np.exp(-t / rise_s)) * np.exp(-t / fall_s)
        out[int(s * SR):][:len(t)] += undb(db) * modes * envelope
    return out


def bumps():
    """Soft low knocks: a short ring with a dull thud in it."""
    s, db, _ = np.transpose(BUMPS)
    out = colour(grit(2.5) * bursts(s + 0.005, db - 4.0, 0.0082, 0.012), BUMP_COLOUR)
    for at, peak_db, hz in BUMPS:
        out += bursts(at + 0.0082, peak_db, 0.0026, 0.015) * np.sin(2 * np.pi * hz * (TIME - at))
    return out


def motor(mesh_hz, whine_db, hum_db):
    """Shaft harmonics and gear partials share one wavering speed; play in the gears blurs the higher hum."""
    mesh = 2 * np.pi * np.cumsum(mesh_hz * (1 + 0.00267 * walk(250))) / SR
    shaft = mesh / TEETH
    play = 0.032 * walk(150)
    hum = sum(undb(db + 4.65 * walk(45)) * np.sin(k * (shaft + play)) for k, db in zip(HUM_ORDERS, HUM_DB))
    # partials swell as they cross a resonance
    hum = colour(hum, [(100, 0), (3900, 0), (4700, -5)], HULL + CASING)
    teeth = sum(undb(db + 1.9 * walk(120)) * np.exp(1j * k * shaft) for k, db in zip(GEAR_ORDERS, GEAR_DB))
    # uneven teeth smear the lines
    whine = np.imag(teeth * (1 + TOOTH_ROUGHNESS * (walk(500) + 1j * walk(500))))
    return undb(whine_db) * unit(whine) + undb(hum_db) * unit(hum)


def squeal(mesh_hz, db):
    """As load drags the speed down, thin whines join and gears squeal an octave up, split by the carrier."""
    shaft = 2 * np.pi * np.cumsum(mesh_hz) / SR / TEETH
    octave_phase = 4 * np.pi * np.cumsum(mesh_hz * (1 + .008 * walk(700))) / SR
    carrier = shaft * .6  # planet carrier
    excess_hz = np.maximum(mesh_hz - SQUEAL_BELOW_HZ, 0)
    octave_gain = undb(3.4 * walk(220) - SQUEAL_FADE_DB_PER_HZ * excess_hz)
    octave = octave_gain * np.sin(octave_phase) * np.sqrt(2) * np.cos(carrier)
    whines = sum(undb(rel_db + 2 * walk(100)) * np.sin(k * shaft + .7 * walk(400))
                 for k, rel_db in zip(LOAD_ORDERS, LOAD_DB))
    return undb(db) * (octave + undb(-LOAD_FADE_DB_PER_HZ * excess_hz) * whines)


def cutting(scrape_db, dust_db):
    """Edges tear glass fibres: a fluttering scrape through hull and casing, and a gusty hiss of chips."""
    flutter = walk(110)
    scrape = grit(0.91) * undb(scrape_db - 1.5 + 0.39 * flutter)
    dust = grit(1.3) * undb(dust_db + 0.8 + 1.2 * flutter + 0.73 * walk(25))
    return colour(scrape, SCRAPE_COLOUR, HULL + CASING) + colour(dust, DUST_COLOUR)


def panel_thumps(start_hz=1100, end_hz=85, glide_s=0.0033, fall_s=0.0064):
    """Bending waves travel faster when short, so each flex arrives as a falling chirp."""
    out = np.zeros(N)
    t = TIME[:SR // 10]
    turns = end_hz * t + (start_hz - end_hz) * glide_s * (1 - np.exp(-t / glide_s))
    envelope = (t / fall_s) * np.exp(.5 - .5 * (t / fall_s) ** 2)
    chirp = np.sin(2 * np.pi * turns) * envelope
    for s, db in THUMPS:
        out[int(s * SR):][:len(t)] += undb(db) * chirp
    return out


def low_thuds(delay_s=.006, side_db=-10):
    """Bumps and panel thumps come from the middle; their echo off the ground widens them."""
    thuds = bumps() + panel_thumps()
    side = undb(side_db) * np.interp(TIME - delay_s, TIME, thuds)
    return thuds + np.array([side, -side])


def hammer_blows():
    """While the bit is bound the hammer strikes almost steadily: rows of t/s, body/dB, crack/dB."""
    blows = []
    for start_s, count, per_s, body_db, crack_db, change_db in BINDS:
        rattle = np.array([(s, body_db, crack_db + change_db * part)
                           for s, part in train(start_s, count, per_s)])
        spread = [BLOW_JITTER_S, BLOW_BODY_SCATTER_DB, BLOW_CRACK_SCATTER_DB]
        scatter = rng.standard_normal(rattle.shape) * spread
        blows.extend(rattle + scatter - scatter.mean(axis=0))
    return blows


def hammer(blows):
    """Each blow jerks the bit through the laminate in a short rasp of its own colour; harder ones last longer."""
    s, body_db, crack_db = np.transpose(blows)
    length = undb(0.35 * np.maximum(body_db + 40, -4))

    def rasp(db):
        """Gritty bell-shaped bursts, one to a blow."""
        return grit(2.2) * bursts(s, db, 0.0026 * length, 0.0044 * length, roundness=2)

    out = colour(rasp(body_db + 1.0), BLOW_COLOUR, HULL)
    # each blow bites at another spot, so the bands ring unevenly
    rap_db = RAP_SCATTER_DB * rng.standard_normal((len(s), len(RAPS))).T
    for (hz, db), uneven in zip(RAPS, rap_db):
        band = [(hz / 2, -45), (hz / 1.35, -14), (hz, 0), (hz * 1.36, -14), (hz * 2, -45)]
        out += colour(rasp(body_db + db + uneven), band, HULL)
    crack = bursts(s, crack_db + 5.0, 0.0028 * length, 0.0042 * length)
    return out + colour(grit(4.4) * crack, CRACK_COLOUR)


def driver(mesh_hz, blows):
    """The impact driver from trigger pull to brake: speed and cut drive gears and bit, the hammer adds blows."""
    scrape_db, dust_db, hum_db = curves(BORING)
    spin_up = (TIME - TRIGGER_ON_S) / SPIN_UP_S
    brake = 1 - (TIME - TRIGGER_OFF_S) / BRAKE_S
    trigger = np.clip(np.minimum(spin_up, brake), 0, 1)
    gears = motor(mesh_hz, scrape_db + WHINE_OVER_SCRAPE_DB, hum_db)
    gears += squeal(mesh_hz, dust_db + SQUEAL_OVER_DUST_DB)
    return trigger * (gears + cutting(scrape_db, dust_db)) + hammer(blows)


def scene():
    """Bottle and handling, then the driver, over the yard."""
    pumping = np.transpose(strokes())
    ticking = creaks(pumping[0], pumping[1]) + STRAY_TICKS
    mesh_hz = curves(WHINE_PITCH)[0] * (1 + WOBBLE * walk(WOBBLE_PER_S))
    blows = hammer_blows()
    # the second call keeps the timing but has other fine grain, for the width
    small = place(nearby(pumping, ticking), nearby(pumping, ticking), SMALL_BALANCE, SMALL_DIFFUSE)
    tool = place(driver(mesh_hz, blows), driver(mesh_hz, blows), TOOL_BALANCE, TOOL_DIFFUSE, HULL_LEAD)
    return small + rings() + tool + low_thuds() + yard()


def record(dry):
    """The recorder rounds the loudest peaks and cuts the top."""
    low_pass = signal.ellip(10, .2, 70, TOP_HZ, fs=SR, output="sos")
    return signal.sosfilt(low_pass, np.tanh(dry))


dry = scene()
out = record(dry)
dump_mix(out)
```